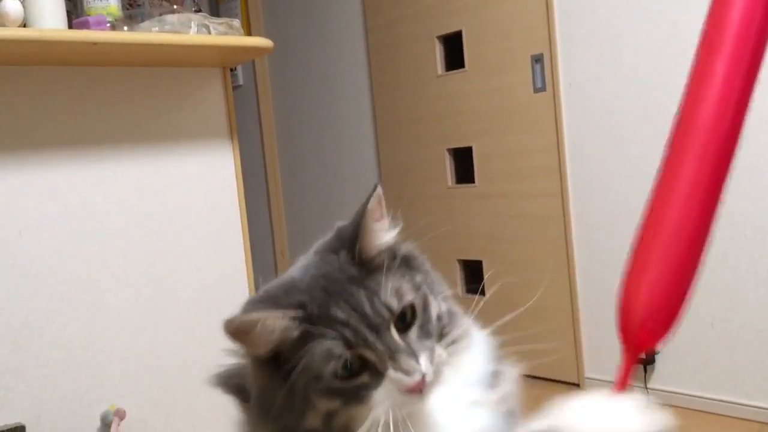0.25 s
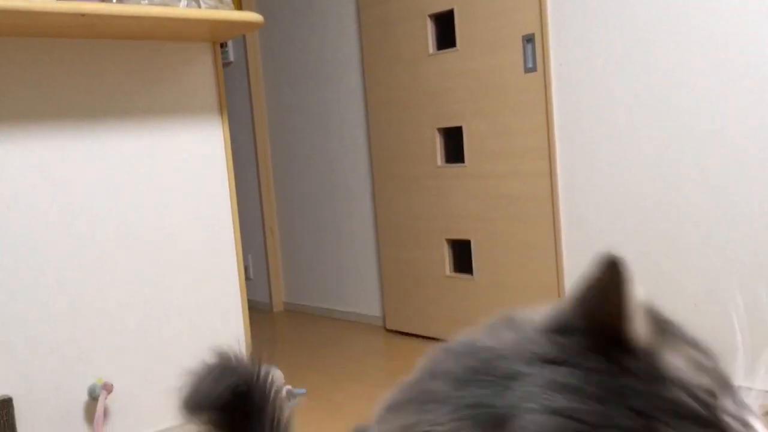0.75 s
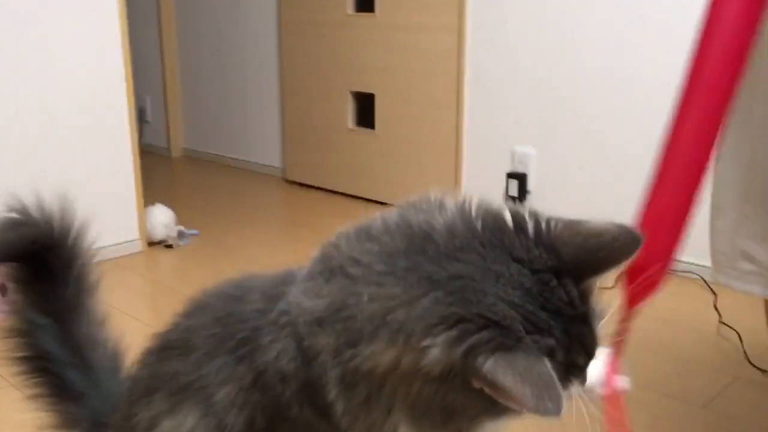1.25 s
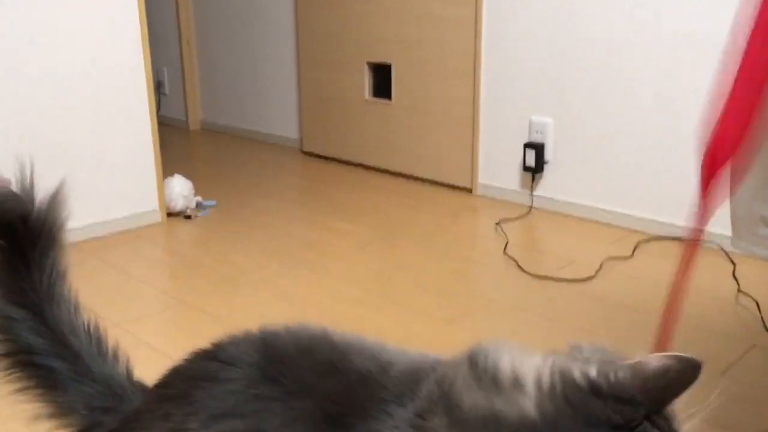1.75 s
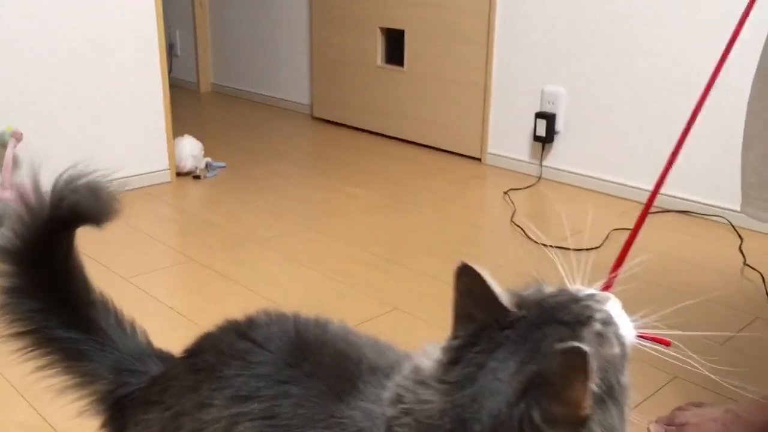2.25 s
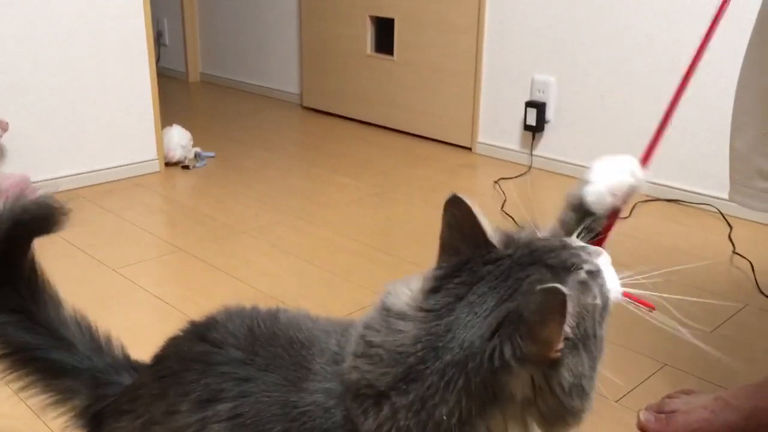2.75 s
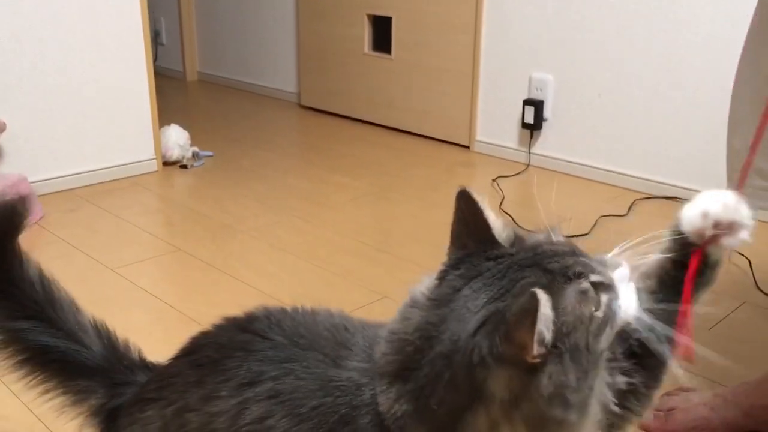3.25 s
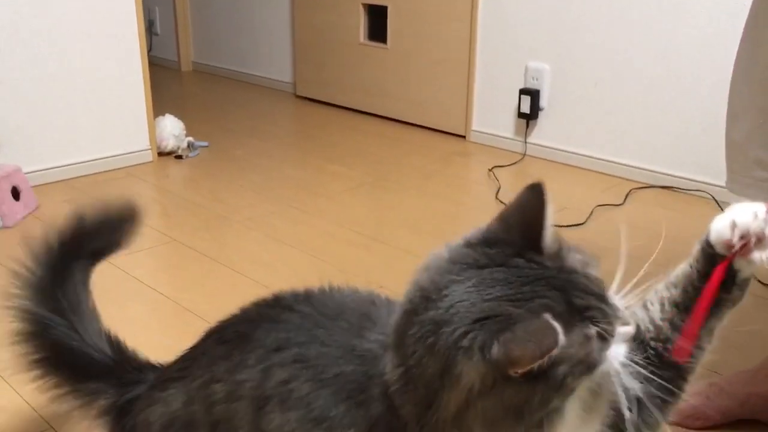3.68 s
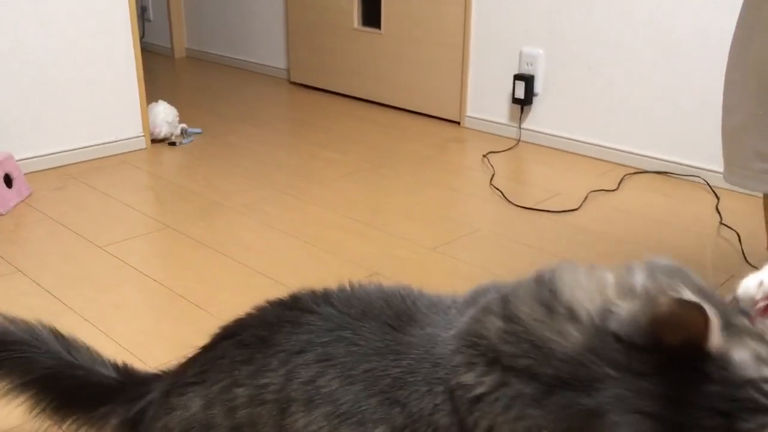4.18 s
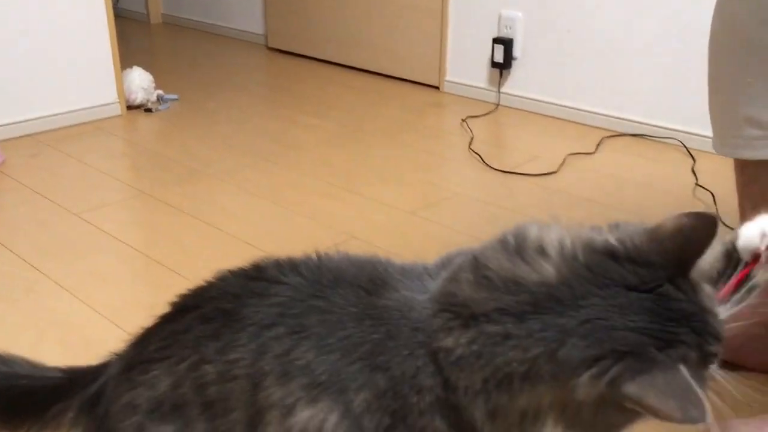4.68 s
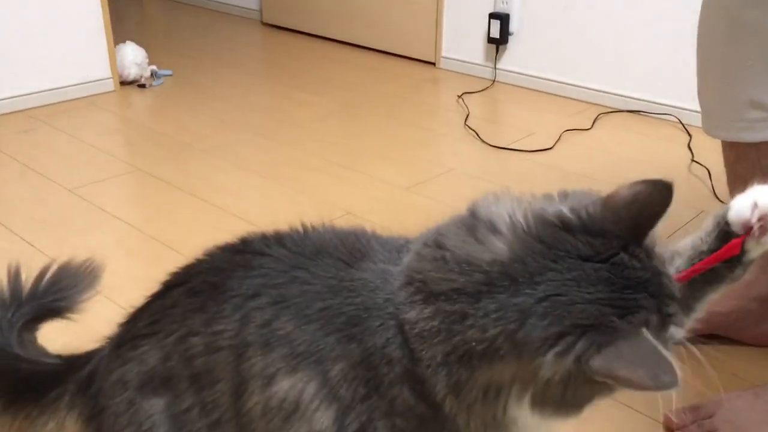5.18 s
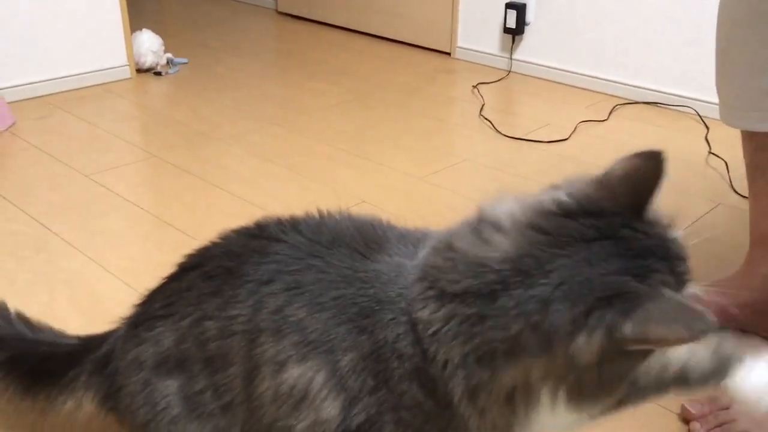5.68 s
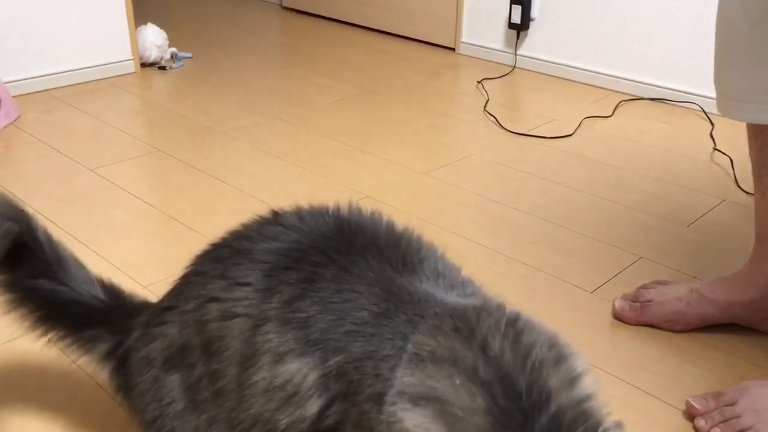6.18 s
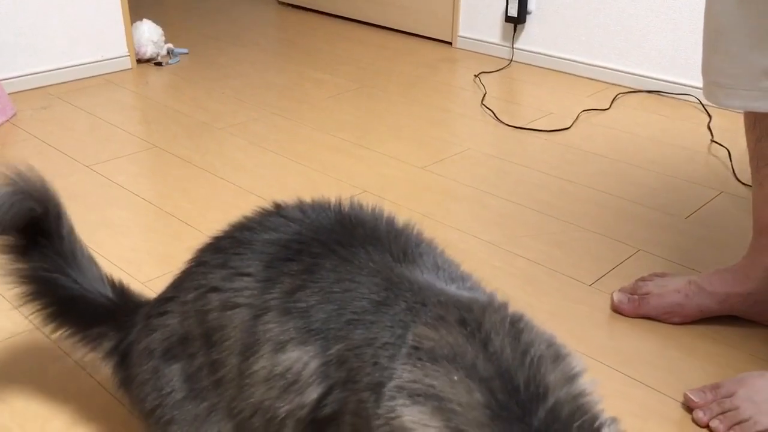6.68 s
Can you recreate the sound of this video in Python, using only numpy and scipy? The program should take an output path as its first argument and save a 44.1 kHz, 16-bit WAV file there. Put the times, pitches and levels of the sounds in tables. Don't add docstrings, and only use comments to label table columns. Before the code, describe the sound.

A cat paws a long balloon with faint rubbery creaks, it bursts in a short rush of air, and later the rubber snaps loudly on the floor.

```python
import sys
import numpy as np
from scipy import signal
from scipy.fft import rfft, irfft, next_fast_len
from scipy.io import wavfile
from scipy.ndimage import map_coordinates

SR = 44100
rng = np.random.default_rng(int(sys.argv[2]) if len(sys.argv) > 2 else 0)


def put_to_file(sound):
    columns = np.atleast_2d(sound).T
    safe = np.clip(columns, -1, 1)
    whole_steps = np.round(safe * 32767)
    wavfile.write(sys.argv[1], SR, whole_steps.astype(np.int16))


def amplitude_ratio(level_db):
    exponent = np.asarray(level_db, float) / 20
    return 10 ** exponent


N = 305304
T = np.arange(N) / SR
PUFF_SIZE = 8192


def unit(x):
    return x / np.sqrt(np.mean(x ** 2) + 1e-20)


def along(points, hz):
    f, v = np.transpose(points)
    return np.interp(np.log(hz + 1), np.log(f + 1), v)


def wobble(rate):
    knots = rng.standard_normal(int(N * rate / SR) + 4)
    return map_coordinates(knots, [T * rate])


def filtered(x, response):
    m = next_fast_len(len(x) + 8192)
    hz = np.fft.rfftfreq(m, 1 / SR)
    return irfft(rfft(x, m) * response(hz), m)[:len(x)]


def bumps(table):
    return lambda hz: amplitude_ratio(sum(db * np.exp(-((hz - c) / w) ** 2) for c, w, db in table))


def noise(spectrum, size=N):
    return unit(filtered(rng.standard_normal(size), lambda hz: amplitude_ratio(along(spectrum, hz))))


def add(track, s, x):
    part = track[..., round(s * SR):][..., :x.shape[-1]]
    part += x[..., :part.shape[-1]]


def ramp(s, length):
    return np.clip((T - s) / length, 0, 1)


def fade(t60, rise):
    t = T[:PUFF_SIZE]
    return (1 - np.exp(-t / rise)) * amplitude_ratio(-60 * t / t60)


def puff(spectrum, t60, rise):
    shape = fade(t60, rise)
    burst = noise(spectrum, PUFF_SIZE) * shape
    click = np.arange(PUFF_SIZE) == 16
    pulse = filtered(click, lambda hz: amplitude_ratio(along(spectrum, hz)))
    return np.array([unit(burst), unit(pulse)]) * np.sqrt(np.mean(shape ** 2))


# (frequency [Hz], density [dB per Hz])
HISS_OF_JET = [(2650, -35), (4500, -9), (5000, -8.5), (5870, -3), (7980, -3), (9610, -1.5), (10400, -3),
               (11200, -3), (13700, -4.5), (16000, -14.5)]
# (frequency [Hz], density [dB per Hz])
ROAR_OF_JET = [(120, -15), (200, -7), (316, -4), (466, -11.5), (785, -7.5), (2260, -4), (2640, -7.5),
               (4500, -9), (5850, -46.5), (9900, -120)]


def jet():
    start_s, stop_s, opens_s, tear_t60_s = 1.786, 2.0195, 0.016, 0.034
    t = np.clip(T - start_s, 0, 1)
    opening = np.clip(t / opens_s, 0, 1) ** 2
    tear = amplitude_ratio(-60 * t / tear_t60_s)
    hiss = amplitude_ratio(-28.5) * tear + amplitude_ratio(-35 + 9 * t) * opening
    roar = amplitude_ratio(-31.5) * tear + amplitude_ratio(-48 - 18 * t) * opening
    gate = ramp(start_s, .0022) * ramp(stop_s, -.0012)
    flutter = amplitude_ratio(0.7 * wobble(120) + 1.8 * wobble(900))
    return gate * flutter * (hiss * noise(HISS_OF_JET) + roar * noise(ROAR_OF_JET))


# (time [s], peak level [dB], rise [s], t60 [s])
SNAP_CONTACTS = [
    (5.5795, -53.5, 0.0004, 0.012),
    (5.592, -39, .0002, .003),
    (5.5958, -18, 0.00012, .005),
    (5.597, -33.5, .001, .05),
    (5.6015, -1.5, 0.0012, 0.008),
    (5.6029, -3, 0.00038, .006),
    (5.605, -22, .0005, .04),
    (5.6225, -15.5, .0005, .005),
]
# (frequency [Hz], density [dB per Hz])
SNAP_COLOUR = [(59, -38), (100, -12.5), (865, -15), (2120, -9.5), (3200, -8.5), (3940, -5.5), (5100, -5.5),
               (5790, -2), (10300, -8.5), (11200, 1), (12200, -5), (15500, -7.5), (16500, -21.5)]
# (frequency [Hz], width [Hz], level [dB])
BOARD_COLOUR = [(3850, 280, 8), (5750, 300, 7), (2200, 900, -0.5), (9000, 2500, -2.5), (11300, 700, -5),
                (15000, 3000, -3)]


def snap():
    near, walls = np.zeros((2, N))
    for s, db, rise, t60 in SNAP_CONTACTS:
        burst, pulse = amplitude_ratio(db) * puff(SNAP_COLOUR, t60, rise)
        add(near, s, burst)
        add(walls, s, room(filtered(pulse, bumps(BOARD_COLOUR))))
    return near, walls


# (time [s], ring level [dB], crack level [dB], tilt [dB per octave])
CLAW_PLUCKS = [
    (3.1019, -45, -34, 3),
    (3.2423, -31, -27, -1),
]
# (frequency [Hz], level [dB], t60 [s])
STRIP_MODES = [(650, -14, .025), (1310, -2, 0.009), (1910, 1, 0.02), (1930, -18, 0.21), (2500, -10, 0.0046),
               (3500, -3.5, 0.0051), (4250, -14, .03), (4800, -3, 0.01), (6500, -13, .025)]


def plucks():
    out, t = np.zeros((2, N)), T[:PUFF_SIZE]
    crack_colour = [(500, -21.0), (1400, -4), (2000, 2), (3300, -2), (4500, 1), (6300, 0),
                    (9000, -10), (13000, -19), (16500, -31.5)]
    for s, db, crack_db, tilt_db in CLAW_PLUCKS:
        ring = 0
        for hz, level, t60 in STRIP_MODES:
            mode_amp = amplitude_ratio(level + tilt_db * np.log2(hz / 1900))
            ring = ring + mode_amp * np.sin(2 * np.pi * hz * t) * fade(t60, 0.00036)
        crack = puff(crack_colour, 0.011, 0.00031)
        add(out, s, amplitude_ratio(db) * ring + amplitude_ratio(crack_db) * crack)
    return out


# (time [s], level [dB], body frequency [Hz])
RUBBER_CREAKS = [(0.1557, -61, 3500), (.399, -56.5, 1700), (.549, -62, 2500), (.614, -63, 3000),
                 (.7063, -53, 4800), (.707, -59.5, 1200), (1.5185, -61, 2800), (1.55, -59, 2800),
                 (1.5657, -52.5, 2580), (1.5924, -45.5, 2800), (1.6132, -49, 2500), (1.645, -46, 2380),
                 (1.657, -49, 2200), (2.3825, -65, 3000), (4.9252, -64, 2440), (4.9692, -52, 5050),
                 (4.9701, -59.5, 1800), (5.7653, -47, 4500), (5.7673, -51, 1500), (5.8926, -51.5, 6000),
                 (5.9104, -51, 5500)]
# (time [s], body level [dB], bright level [dB], body frequency [Hz])
RUBBER_SPITS = [(.2266, -43.5, -48.5, 4260), (1.414, -59, -68, 6500), (1.594, -40.5, -31, 4800),
                (1.603, -63, -50, 6000), (1.7827, -36, -34.5, 5000), (1.784, -33.5, -30.5, 1110),
                (2.015, -35, -43, 1900), (3.803, -63, -65, 4500), (5.76, -44, -45, 5500),
                (6.085, -65, -66, 5020), (6.278, -70, -65, 6500)]


def ticks():
    creak_bright_db, creak_cycles, spit_t60_s = -25.5, 37, 0.0054
    rows = [(s, db, db + creak_bright_db, hz, creak_cycles / hz) for s, db, hz in RUBBER_CREAKS]
    rows += [(*row, spit_t60_s) for row in RUBBER_SPITS]
    out = np.zeros((2, N))
    for s, db, bright_db, hz, t60 in rows:
        body_colour = [(hz / 5, -26), (hz / 2.8, -8), (hz, 0), (hz * 1.54, -8), (hz * 3, -30)]
        body = puff(body_colour, t60, 0.00021)
        spit = puff([(3500, -15), (7000, 3), (12000, 3.5), (16500, -13)], 0.93 * t60, 0.00018)
        add(out, s, amplitude_ratio(db) * body + amplitude_ratio(bright_db) * spit)
    puffs, clicks = out
    return np.array([0.76 * puffs + 0.77 * clicks, clicks])


# (time [s], level [dB],
# frequency [Hz], t60 [s])
BLOW_RINGS = [(1.785, -33.5, 255, 0.029), (1.785, -43, 368, 0.064), (1.786, -46, 509, .03),
              (1.785, -39.5, 692, .03), (1.787, -38, 1110, .03), (1.797, -37.5, 68.6, 0.2),
              (1.81, -42.5, 188.7, 0.091), (4.926, -72, 5570, .015), (4.969, -60, 5580, 0.03),
              (5.603, -43, 149.5, 0.073), (5.603, -44, 230, 0.042), (5.604, -42, 411, 0.037),
              (5.604, -41.5, 797, 0.032), (5.769, -60, 990, 0.063)]
# (time [s], level [dB])
PAW_LANDINGS = [
    (0.31, -41),
    (0.547, -50),
    (.619, -46),
    (2.919, -53),
    (3.782, -53),
]


def thuds():
    board_hz, board_t60_s = 280, 0.044
    blows = BLOW_RINGS + [(s, db, board_hz, board_t60_s) for s, db in PAW_LANDINGS]
    out = np.zeros(N)
    for s, db, hz, t60 in blows:
        add(out, s, amplitude_ratio(db + 5.5) * np.sin(2 * np.pi * hz * T[:PUFF_SIZE]) * fade(t60, 0.0012))
    return out


# (time [s], dull level [dB], bright level [dB])
FUR_SCUFFS = [
    (.227, -59, -67.5),
    (.706, -67, -85),
]
# (time [s], length [s], dull level [dB], bright level [dB])
FUR_DRAGS = [
    (.0, 0.24, -80, -92),
    (0.263, .43, -72, -80),
    (0.726, 0.29, -74.5, -74.5),
    (0.921, 0.059, -71.5, -65),
    (.97, .15, -78, -82),
    (6.82, .15, -81, -80),
]
# (time [s], length [s], level [dB], frequency [Hz])
PAD_SWIPES = [
    (0.304, 0.075, -71, 6500),
    (0.347, .08, -70, 5200),
    (0.458, 0.068, -70.5, 5170),
    (0.765, .06, -75.5, 2900),
    (0.833, .08, -79, 6500),
    (6.13, .07, -80.5, 6000),
    (6.88, 0.045, -78, 6300),
]


def rustle():
    touch = np.zeros((2, N))
    for s, *db in FUR_SCUFFS:
        add(touch, s, amplitude_ratio(db)[:, None] * fade(.16, .001))
    for s, length, *db in FUR_DRAGS:
        touch += amplitude_ratio(db)[:, None] * ramp(s, .25 * length) * ramp(s + length, -.7 * length)
    grain = 2.0 * wobble(60) + 2.7 * wobble(500)
    dull = noise([(800, -7), (2500, -6.0), (5500, -4), (8000, -10.0), (12000, -21.0)])
    bright = noise([(4000, -27.5), (8000, -2.5), (14000, -2.5), (15800, -7.0), (16000, -60)])
    out = touch[0] * unit(amplitude_ratio(grain + 1.5 * wobble(30)) * dull)
    out += touch[1] * unit(amplitude_ratio(grain + 1.6 * wobble(30)) * bright)
    for s, length, db, hz in PAD_SWIPES:
        stroke = np.sin(np.pi * np.clip(T[:PUFF_SIZE] / length, 0, 1)) ** 2
        colour = [(hz / 1.6, -30), (hz / 1.15, -4), (hz, 0), (hz * 1.04, -4), (hz * 2.0, -30)]
        add(out, s, amplitude_ratio(db) * stroke * noise(colour, PUFF_SIZE))
    return out + leak()


def leak():
    start_s, stop_s, edge_s = .05, 1.62, .25
    angle = 2 * np.pi * 3515 * T + 1.2 * wobble(15)
    level = ramp(start_s, edge_s) * ramp(stop_s, -edge_s) * amplitude_ratio(-84.5 - 0.3 * T)
    return level * amplitude_ratio(3.6 * wobble(12.1)) * (np.sin(angle) + .45 * np.sin(2 * angle))


# (frequency [Hz], t60 [s])
WALL_DECAY = [(100, .35), (1000, 0.26), (4000, 0.25), (10000, 0.22), (16000, 0.27)]


def room(x, delay=0.0013):
    hz, t, z = signal.stft(rng.standard_normal(SR // 2), SR, nperseg=256)
    decay = amplitude_ratio(-60 * t / along(WALL_DECAY, hz)[:, None])
    tail = signal.istft(z * decay, SR, nperseg=256)[1]
    tail = tail * (1 - np.exp(-T[:len(tail)] / delay))
    return signal.fftconvolve(x, tail / np.linalg.norm(tail))[:N]


# (frequency [Hz], starting angle [turns], tone level [dB], octave level [dB])
FAN_TONES = [(70.977, .613, -56.5, -71), (83.749, .197, -58.5, -69)]
# (frequency [Hz], level [dB])
STEADY_HUMS = [(61.9, -85.5), (95.7, -69.5), (191.6, -77.5)]


def fans():
    hunt = .062 * np.sin(2 * np.pi * (T - .3) / 4.3)
    out = np.zeros(N)
    for hz, start, db, octave_db in FAN_TONES:
        turns = start + hz * T + hunt
        out += amplitude_ratio(db + 3.5) * np.sin(2 * np.pi * turns)
        out += amplitude_ratio(octave_db + 3.5 + 2.0 * wobble(5.9)) * np.sin(4 * np.pi * turns)
    for hz, db in STEADY_HUMS:
        level = amplitude_ratio(db + 5.0 + 1.6 * wobble(2.8))
        out += level * np.sin(2 * np.pi * hz * T + 1.0 * wobble(1.8))
    return out


# (frequency [Hz], density [dB per Hz])
HOUSE_COLOUR = [(15, -31), (25, -16), (36, -3), (60, -5), (90, 2), (130, -9.5), (300, -6), (420, -13.5),
                (930, -19), (1900, -28), (4000, -46), (9000, -73.5)]
# (middle time [s], half length [s], rise [dB])
HOUSE_SWELLS = [
    (.4, .62, 3.5),
    (1.15, 0.17, 1),
    (1.62, .2, 3),
    (3.423, 0.91, 4),
    (5.8, .2, 4.5),
    (6.902, 0.39, 4),
]


def house():
    rest_db = -73
    swell_db = rest_db + sum(db * np.exp(-((T - s) / half) ** 4) for s, half, db in HOUSE_SWELLS)
    air = noise(HOUSE_COLOUR)
    low = filtered(air, lambda hz: 1 / (1 + (hz / 420) ** 4))
    duct = noise([(840, -39.5), (900, -4.5), (920, 0.0), (945, -6), (1000, -44)])
    middle = unit(air - low) + amplitude_ratio(-10.0) * duct
    return amplitude_ratio(-60.0 + 0.69 * wobble(2.5)) * low + amplitude_ratio(swell_db - 1.0 + 0.57 * wobble(10)) * middle


def scene():
    air, blows = jet(), thuds()
    cracks, walls = snap()
    lasting = air + amplitude_ratio(-7.5) * room(air) + blows + amplitude_ratio(-14) * room(blows)
    lasting = lasting + rustle() + fans() + house() + amplitude_ratio(-9.5) * walls
    for (near, heard_by_walls), wet_db in [(ticks(), -6.5), (plucks(), -7)]:
        cracks = cracks + near
        lasting = lasting + amplitude_ratio(wet_db) * room(heard_by_walls)
    return (cracks + filtered(lasting, lambda hz: hz < 15850))[None]


def low_pass(x):
    return signal.sosfilt(signal.butter(12, 16970, fs=SR, output="sos"), x)


# (frequency [Hz], density [dB per Hz])
MICROPHONE_HISS = [(300, -13), (2000, 3.5), (5000, 0.5), (12600, -3), (16000, -11)]
# (start time [s], end time [s], level [dB])
COARSE_RANGE = [
    (5.6, 6.024, -68),
]
# (frequency [Hz], width [Hz], level [dB])
PORT_DIPS = [(4970, 360, -2), (7750, 540, -2), (10470, 480, -3)]


def record(dry):
    hiss = amplitude_ratio(-77.5 + .3 * wobble(18)) * noise(MICROPHONE_HISS)
    for start, end, db in COARSE_RANGE:
        coarse = noise([(300, -9), (3000, -5), (12700, -10.5), (16000, -20.5)])
        hiss += amplitude_ratio(db) * (T > start) * (T < end) * coarse
    mix = filtered(dry[0] + hiss, bumps(PORT_DIPS))[None]
    return low_pass(mix)


dry = scene()
out = record(dry)
put_to_file(out)
```